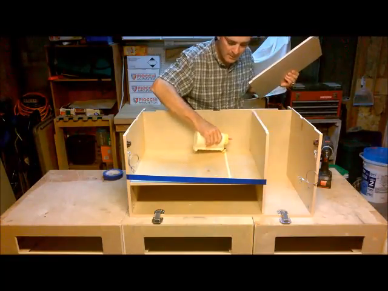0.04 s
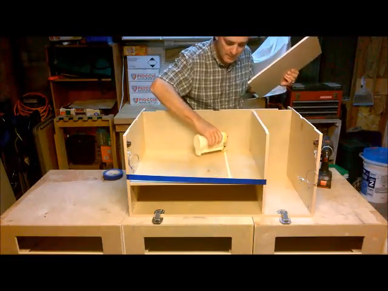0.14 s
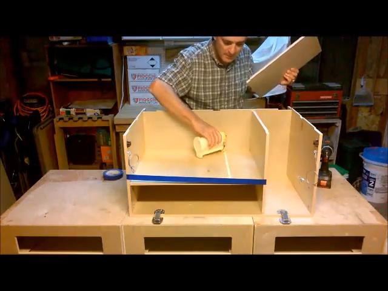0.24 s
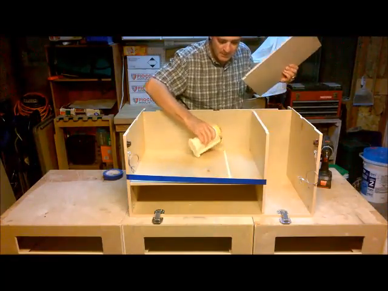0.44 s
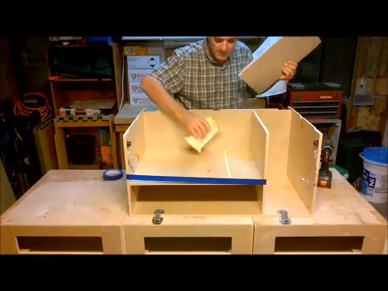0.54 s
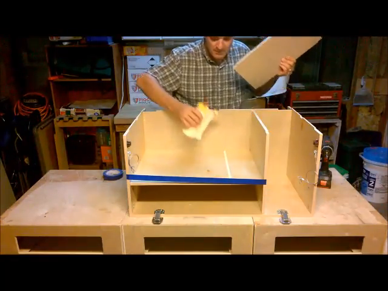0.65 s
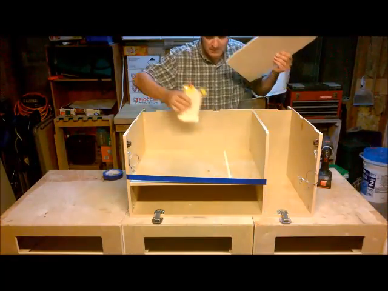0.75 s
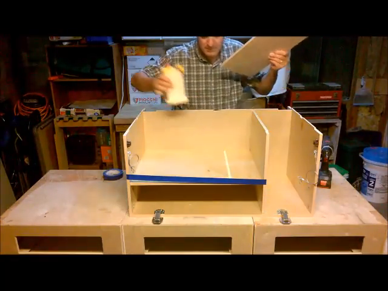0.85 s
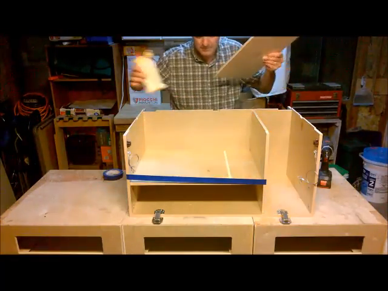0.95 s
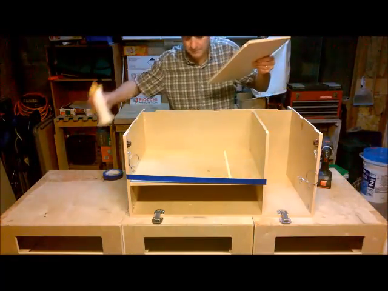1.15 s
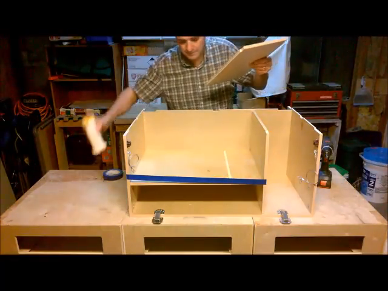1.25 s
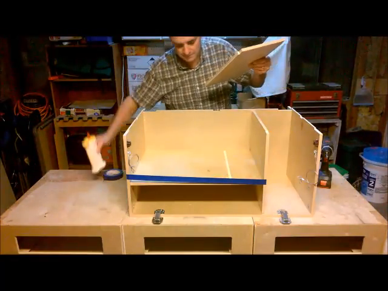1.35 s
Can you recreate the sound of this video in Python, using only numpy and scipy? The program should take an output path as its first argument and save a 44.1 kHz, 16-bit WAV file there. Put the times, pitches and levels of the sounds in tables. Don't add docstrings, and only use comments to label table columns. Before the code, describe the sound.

Hollow wooden clatter of a bottle against a plywood box, then quiet with faint crickets

```python
import sys
import numpy as np
from scipy import signal
from scipy.fft import rfft, irfft, next_fast_len
from scipy.io import wavfile
from scipy.ndimage import uniform_filter1d, map_coordinates

SR = 44100
rng = np.random.default_rng(int(sys.argv[2]) if len(sys.argv) > 2 else 0)


def invert_db(level):
    return 10 ** (np.asarray(level, dtype=float) / 20)


def generate_wav(sig):
    pcm = np.round(np.clip(np.atleast_2d(sig).T, -1, 1) * 32767).astype(np.int16)
    wavfile.write(sys.argv[1], SR, pcm)


N = 61739


def unit(x):
    return x / np.sqrt(np.mean(x ** 2) + 1e-20)


def along(points, hz):
    f, v = np.transpose(points)
    return np.interp(np.log(hz + 1), np.log(f + 1), v)


def wobble(rate):
    knots = rng.standard_normal(int(N * rate / SR) + 4)
    return map_coordinates(knots, [np.arange(N) * rate / SR])


def filtered(x, response):
    m = next_fast_len(N + SR // 2)
    return irfft(rfft(x, m) * response(np.fft.rfftfreq(m, 1 / SR)), m)[..., :N]


def rush(spectrum, patchy_db):
    z = signal.stft(rng.standard_normal(N + 512), nperseg=512)[2]
    field = uniform_filter1d(rng.standard_normal(z.shape), size=4, axis=0)
    field = uniform_filter1d(field, size=5, axis=1)
    x = signal.istft(z * invert_db(patchy_db * unit(field)), nperseg=512)[1][:N]
    return unit(filtered(x, lambda hz: invert_db(along(spectrum, hz))))


def echoes(x, decay, delay_s):
    hz, t, z = signal.stft(rng.standard_normal(SR // 2), SR, nperseg=256)
    fade = invert_db(-60 * t / along(decay, hz)[:, None])
    tail = signal.istft(z * fade, SR, nperseg=256)[1]
    late = np.pad(x, (int(delay_s * SR), 0))
    return signal.fftconvolve(late, tail / np.linalg.norm(tail))[:N]


def room_tone():
    # frequency in Hz, density in dB per Hz.
    air = [(12, -18.5), (20, -1.5), (64, -0.5), (122, -2.5), (140, -10), (385, -17), (422, -17.5),
           (519, -17.5), (4800, -31), (6240, -50.5), (10600, -120)]
    return invert_db(-64) * rush(air, patchy_db=1.53)


def chorus():
    # frequency in Hz, density in dB per Hz.
    band = [(4900, -30), (5500, -10), (5900, -9.5), (6250, -4), (6600, -2), (7000, -6.5), (7400, -16),
            (7900, -40)]
    swell_hz, swell_db = 7.98, 1
    flutter_hz, flutter_db = 250, 0.88
    level_db = -69.5 + swell_db * wobble(2 * swell_hz) + flutter_db * wobble(flutter_hz)
    return invert_db(level_db) * rush(band, patchy_db=1)


def cricket():
    # start in seconds, level in dB.
    chirps = [(-.072, -63.5), (.073, -63.5), (.219, -64), (0.367, -64), (.512, -65.5), (.657, -64),
              (.799, -64.5), (0.945, -65.5), (1.089, -64), (1.238, -64.5), (1.382, -66)]
    # delay in seconds, level in dB.
    pulses = [
        (0, 1),
        (0.021, 4),
        (0.047, 1),
        (.067, -8.5),
    ]
    pitches = [5820, 5890, 5970, 6080]
    pulse_s, sag_hz = 0.01661, 117.7
    beat_hz, beat_depth = 133.4, 0.449
    scatter_db, detune_hz = 0.5, 35
    out, clock = np.zeros(N), np.arange(N) / SR
    chance = rng.standard_normal((len(chirps), len(pulses), 3))
    rough_turns = 0.11 * wobble(500)
    for (start, db), row in zip(chirps, chance):
        for (delay, level), hz, (size, detune, phase) in zip(pulses, pitches, row):
            t = np.clip(clock - start - delay, 0, pulse_s)
            beat = 1 - beat_depth * np.cos(2 * np.pi * beat_hz * t)
            shape = np.sin(np.pi * t / pulse_s) * beat
            sag_turns = sag_hz * t * (t / pulse_s - 1) / 2
            turns = rough_turns + (hz + detune_hz * detune) * t - sag_turns
            tone = np.sin(2 * np.pi * turns + 3 * phase)
            out += invert_db(db + level + scatter_db * size) * shape * tone
    yard = echoes(out, [(6000, 0.12)], delay_s=.004)
    return out + yard


def bottle():
    # time in seconds, level in dB, hardness in Hz, small modes in dB, favoured by the spot in Hz.
    contacts = [(0.149, -64.5, 895, -3, 570), (.2225, -40.5, 716, -8, 596), (.232, -57.5, 760, -11, 662),
                (0.2477, -30, 2500, -8.5, 578.7), (.2560, -33, 2000, -8.5, 280),
                (0.2721, -31, 1500, -11, 238.6), (0.2958, -43, 1200, -5.5, 300), (.317, -43, 900, -15, 300),
                (.354, -35.5, 700, -25, 701), (0.381, -60.5, 600, -23, 680), (0.431, -61, 500, -15.5, 280),
                (0.64, -67, 600, 0.5, 364)]
    # frequency in Hz, level in dB, t60 in seconds.
    panel = [(170, -11, 0.1935), (242.1, -2, 0.086), (280, -12.5, 0.24), (300, -2.5, 0.2),
             (358.4, -2.5, 0.02), (510.6, -8, 0.023), (570, -15, 0.0416), (605.5, -15, 0.026),
             (644.9, -20, 0.1707), (702.1, -23, 0.319), (834.8, -22, 0.24), (981.4, -20, 0.1135),
             (1396, -22, 0.027), (1495.4, -20, 0.165)]
    # frequency in Hz, density in dB per Hz.
    dense = [(140, -37), (220, -9.5), (500, 3), (800, -2), (1600, -3.5), (2500, -11.5), (4000, -14.5),
             (6500, -15.5), (9000, -120)]
    # frequency in Hz, t60 in seconds.
    garage = [(100, 0.274), (500, 0.407), (2000, 0.2724), (6000, 0.2234)]
    attack_s, crack_t60_s, scatter_db = 0.001005, 0.02392, 5.5
    spot_boost_db, spot_octaves = 7, .3
    stilled_s, stilled_db, stilling_s = .4, -10, .014
    ring_send_db, crack_send_db = -9.5, 9
    edge_hz = 190

    out, clock = np.zeros(N), np.arange(N) / SR
    hz, level, t60 = np.transpose(panel)[:, :, None]
    scatter = rng.standard_normal((len(contacts), len(panel), 1))
    for (start, db, hard_hz, dense_db, spot_hz), chance in zip(contacts, scatter):
        t = np.maximum(clock - start, 0)
        rise = (1 - np.exp(-t / attack_s)) ** 2
        spot = spot_boost_db * np.exp(-(np.log2(hz / spot_hz) / spot_octaves) ** 2)
        mode_db = level + spot + scatter_db * chance - 60 * t / t60
        gain = invert_db(mode_db) / (1 + (hz / hard_hz) ** 2)
        ring = np.sum(gain * np.sin(2 * np.pi * hz * t), axis=0) * rise
        small_modes = filtered(rush(dense, patchy_db=0.0), lambda f: 1 / (1 + (f / hard_hz) ** 2))
        crack = invert_db(dense_db - 60 * t / crack_t60_s) * rise * small_modes
        grip = np.clip((clock - stilled_s) / stilling_s, 0, 1) * (start < stilled_s)
        wet = echoes(invert_db(ring_send_db) * ring + invert_db(crack_send_db) * crack, garage, delay_s=0.0074)
        out += invert_db(stilled_db * grip) * invert_db(db) * (ring + crack + wet)

    def edge(f):
        return -f * f / (edge_hz ** 2 - f * f + 1j * f * edge_hz * np.sqrt(2))

    return filtered(out, lambda f: edge(f) ** 2)


def bench():
    start_s, hz, level_db, t60_s, rise_s = .247, 56, -39, .25, .008
    t = np.maximum(np.arange(N) / SR - start_s, 0)
    envelope = invert_db(level_db - 60 * t / t60_s) * (1 - np.exp(-t / rise_s))
    return envelope * np.sin(2 * np.pi * hz * t)


def handling():
    starts = [.774, 1.04]
    # length in seconds, level in dB.
    rubs = [
        (.075, -69),
        (.1, -82),
    ]
    # frequency in Hz, width in Hz, level in dB.
    board = [
        (450, 45, -4),
        (860, 40, 3),
        (1900, 250, -12),
        (3200, 2500, -12),
    ]
    grain_rate_hz, grain_scatter_db = 2500, 3
    touch_db, touch_s = 3, .0007
    rise_s, t60_s, top_hz = .003, .12, 5000

    clock = np.arange(N) / SR
    hits = rng.random(N) < grain_rate_hz / SR
    grains = hits * invert_db(grain_scatter_db * rng.standard_normal(N)) * rng.choice([-1, 1], N)
    touches, stroke = np.zeros(N), np.zeros(N)
    for start, (length, db) in zip(starts, rubs):
        touch = np.clip((clock - start - rise_s) / touch_s, 0, 1)
        touches += invert_db(touch_db) * np.sin(np.pi * touch) ** 2
        fade_db = 60 * np.maximum(clock - start - length, 0) / t60_s
        stroke += invert_db(db - fade_db) * np.clip((clock - start) / rise_s, 0, 1)

    def body(f):
        total = 0
        for k, (centre, width, db) in enumerate(board):
            resonance = 1j * f * width / (centre * centre - f * f + 1j * f * width)
            total = total + (-1) ** k * invert_db(db) * resonance
        return total / (1 + 1j * f / top_hz) ** 4

    return unit(filtered(grains + touches, body)) * stroke


def scene():
    outside = cricket() + chorus()
    inside = bottle() + bench() + handling() + room_tone()
    return (inside + outside)[None]


def microphone_hiss():
    # frequency in Hz, density in dB per Hz.
    hiss = [(3500, -6), (5000, 2), (8000, -3.5), (10000, -4), (12500, -2.5), (15600, -3.5)]
    return invert_db(-74.5) * rush(hiss, patchy_db=-1.84)


def band_limit(x):
    return signal.sosfilt(signal.butter(12, 15680, fs=SR, output="sos"), x)


def record(dry):
    top_hz = 15720
    mix = filtered(dry + microphone_hiss(), lambda hz: hz < top_hz)
    return band_limit(mix)


dry = scene()
out = record(dry)
generate_wav(out)
```